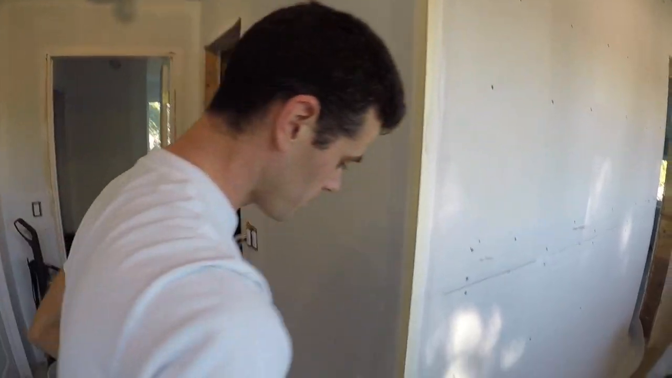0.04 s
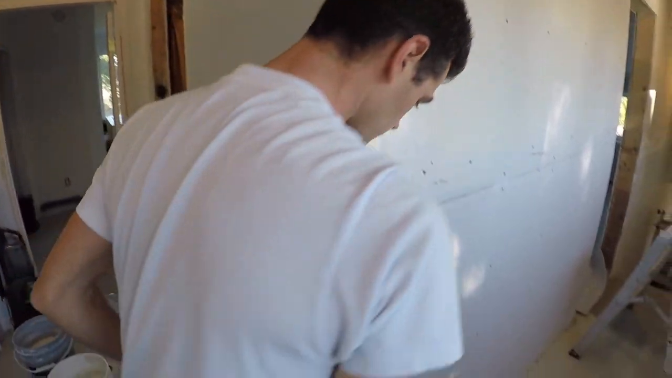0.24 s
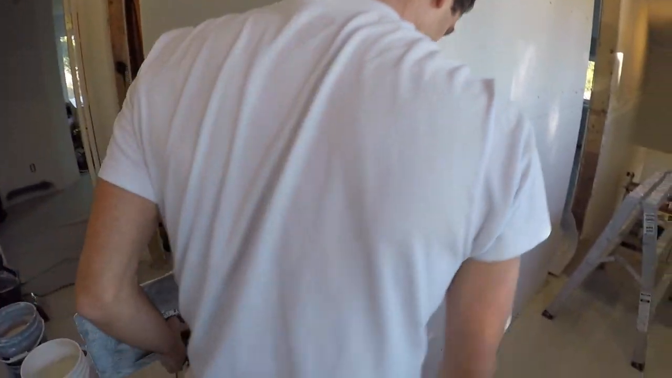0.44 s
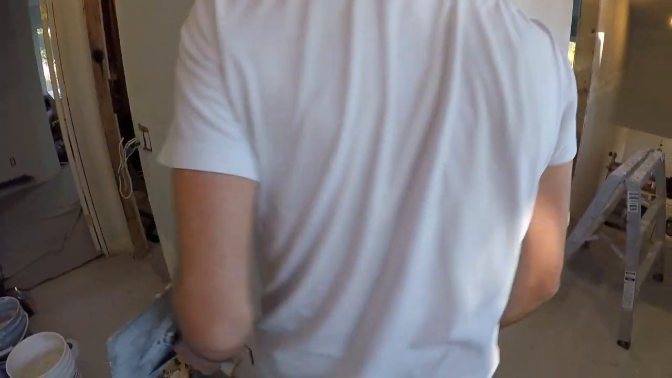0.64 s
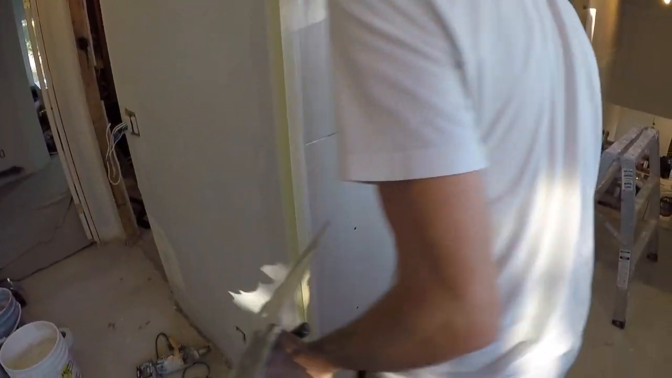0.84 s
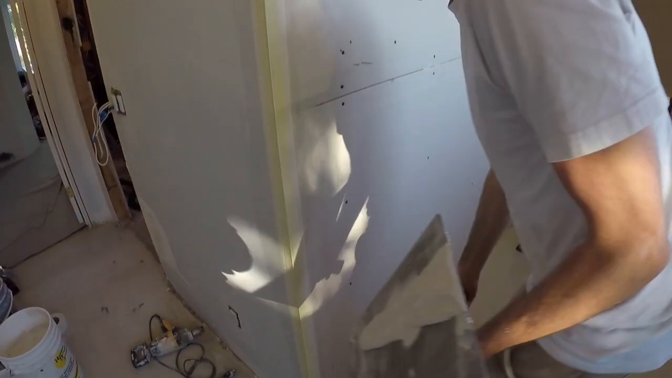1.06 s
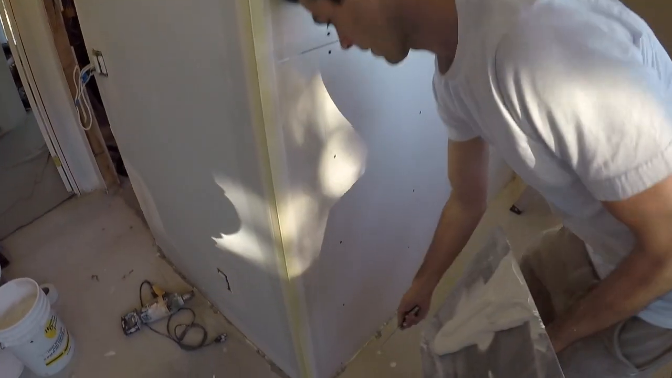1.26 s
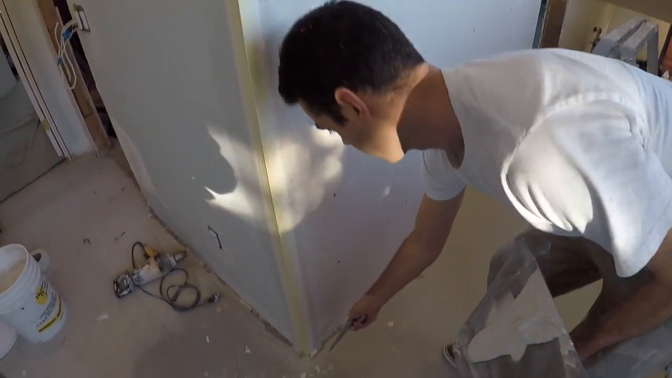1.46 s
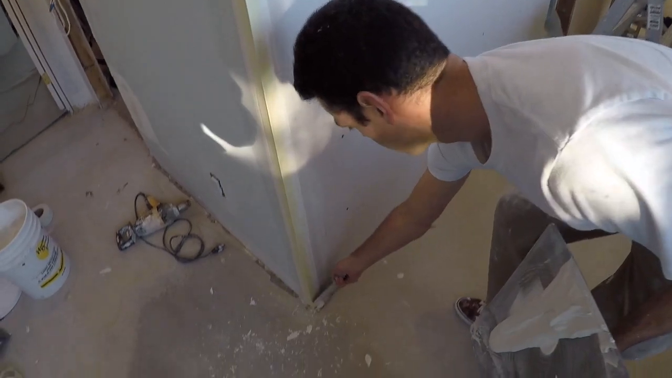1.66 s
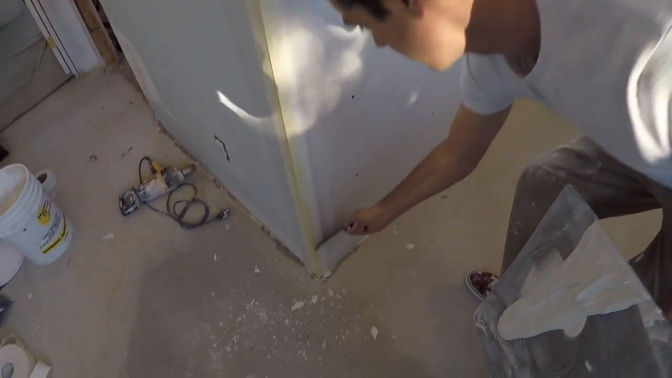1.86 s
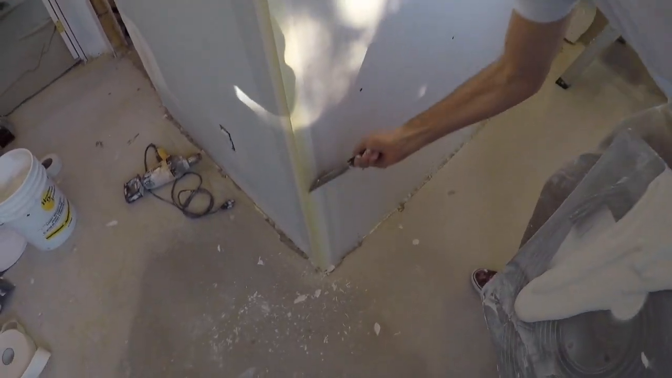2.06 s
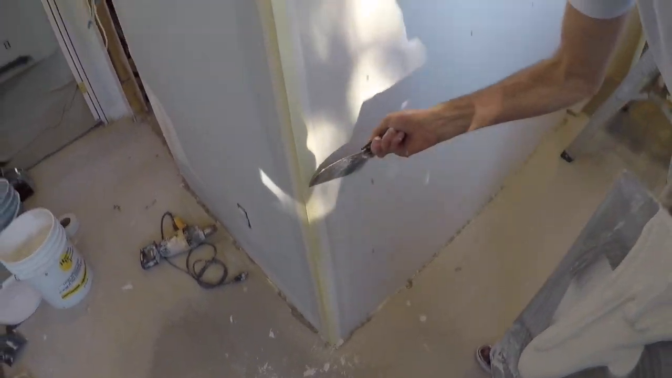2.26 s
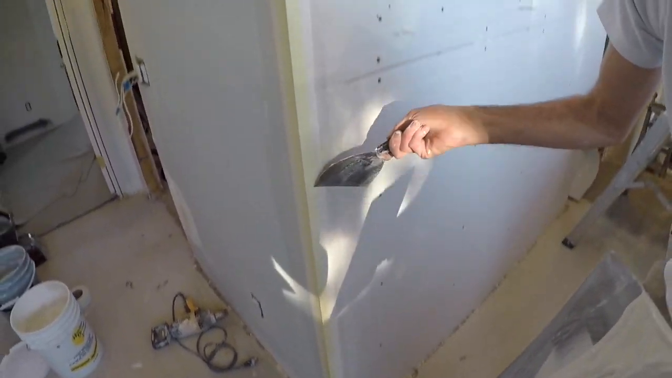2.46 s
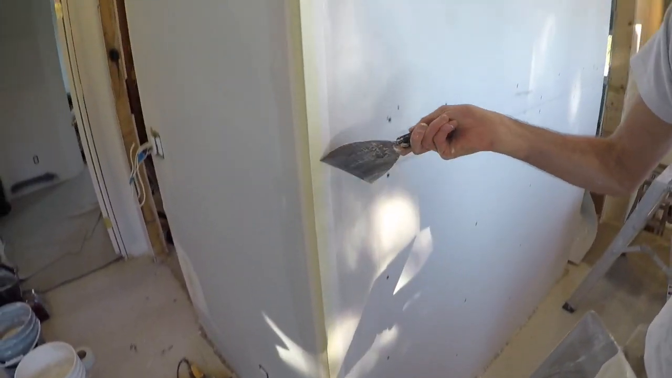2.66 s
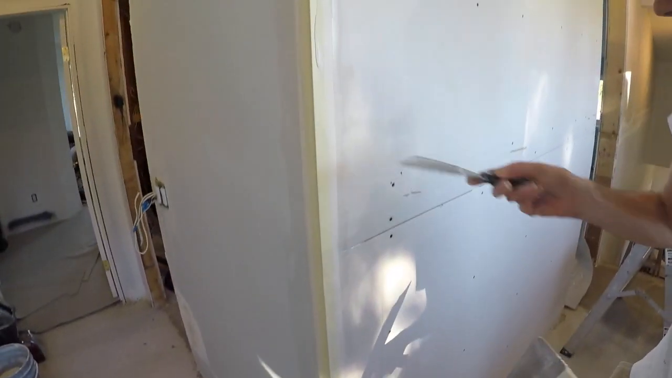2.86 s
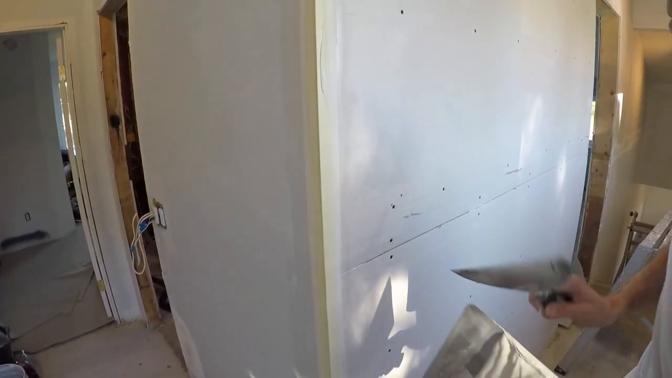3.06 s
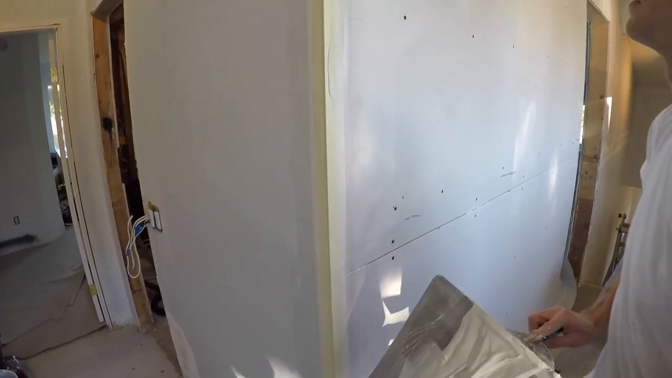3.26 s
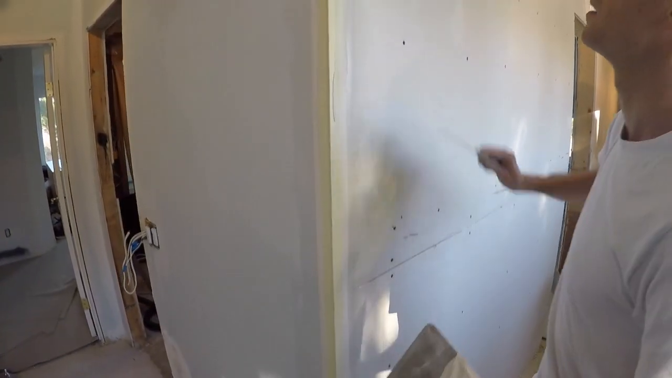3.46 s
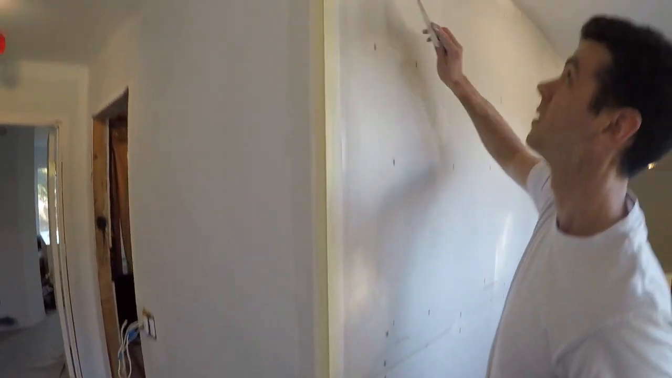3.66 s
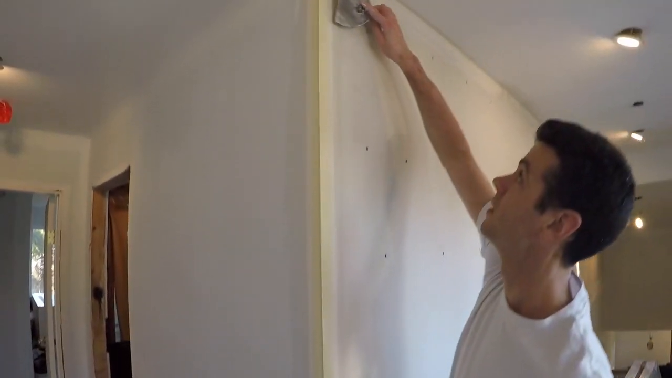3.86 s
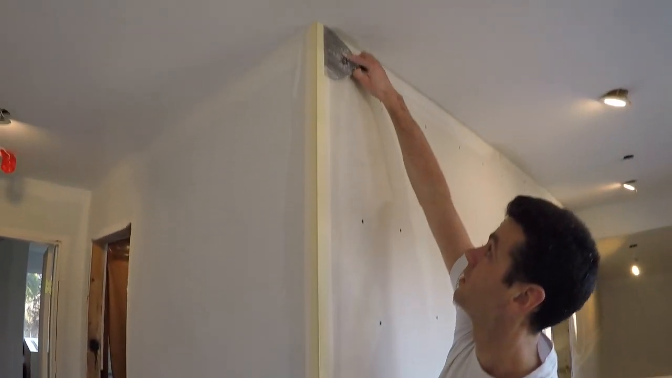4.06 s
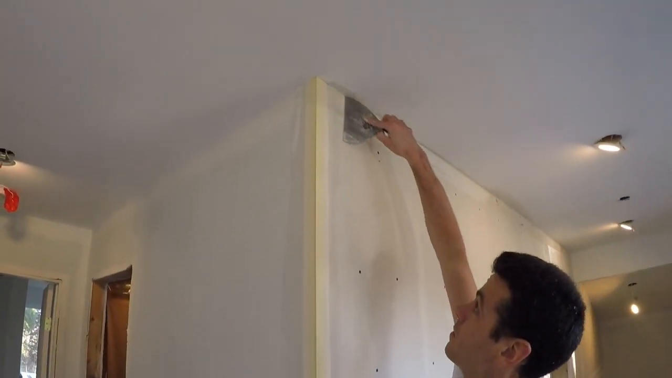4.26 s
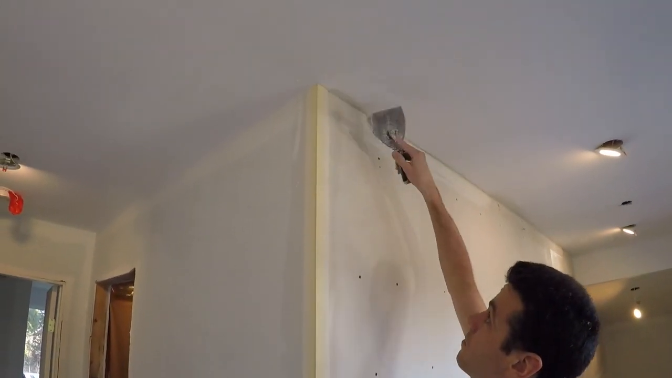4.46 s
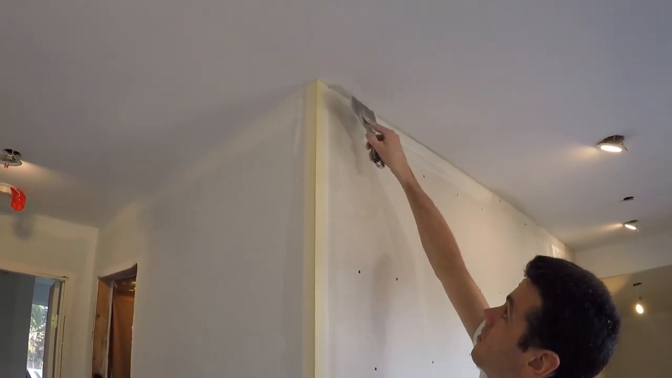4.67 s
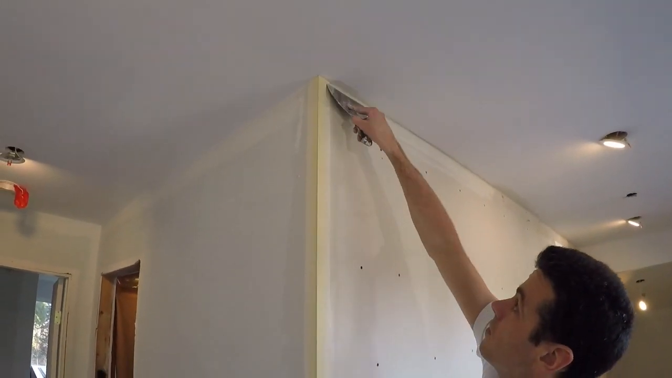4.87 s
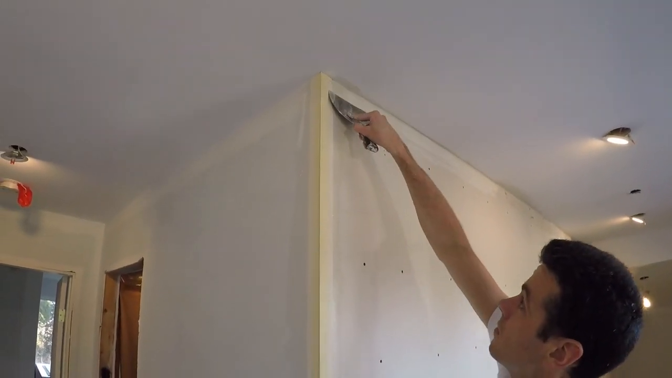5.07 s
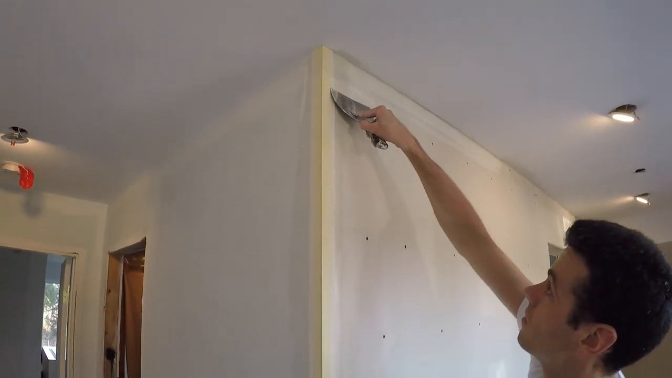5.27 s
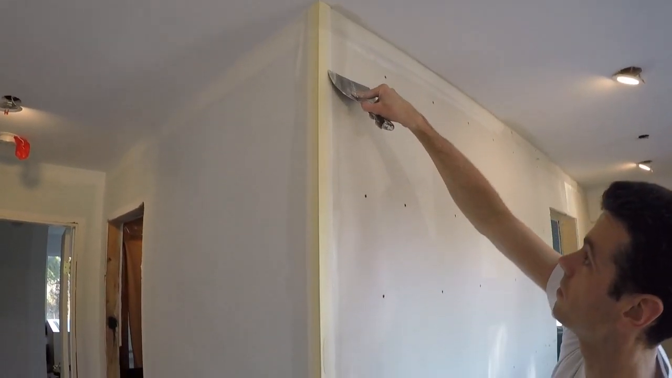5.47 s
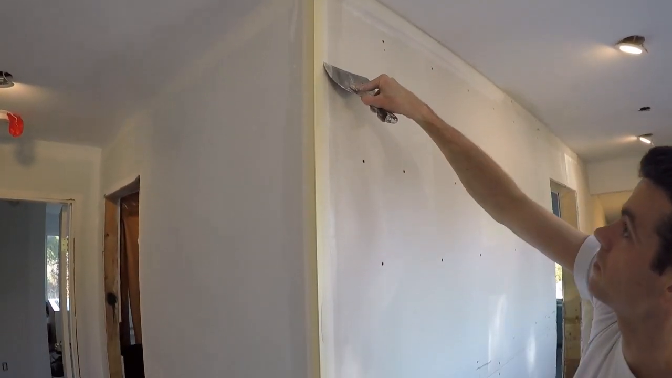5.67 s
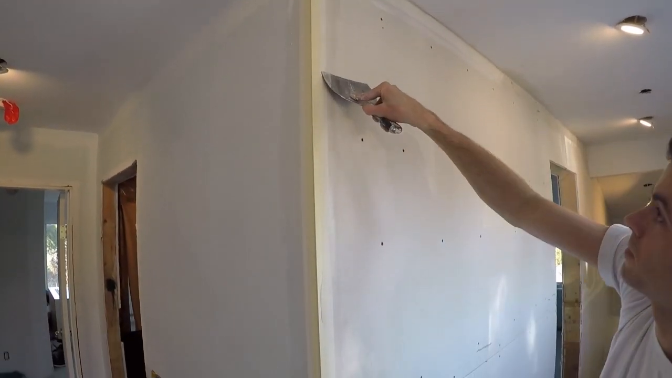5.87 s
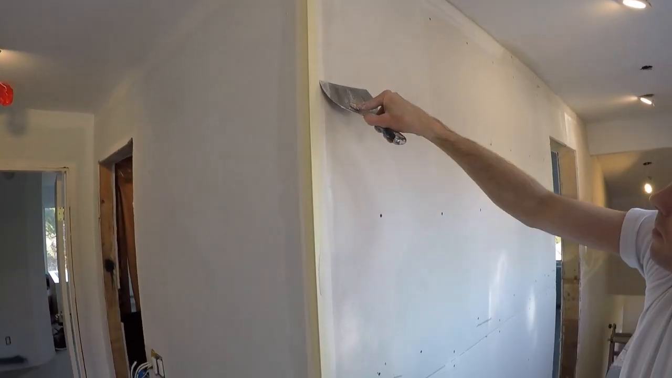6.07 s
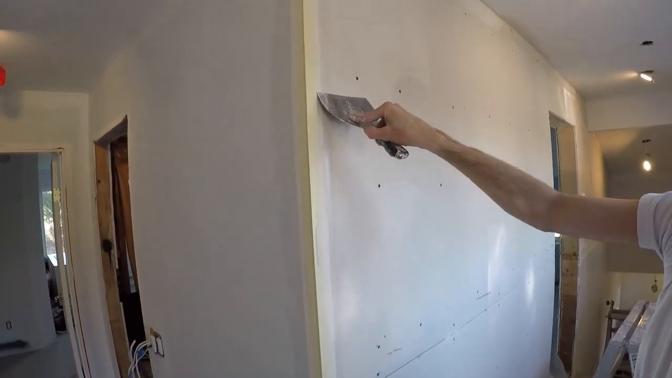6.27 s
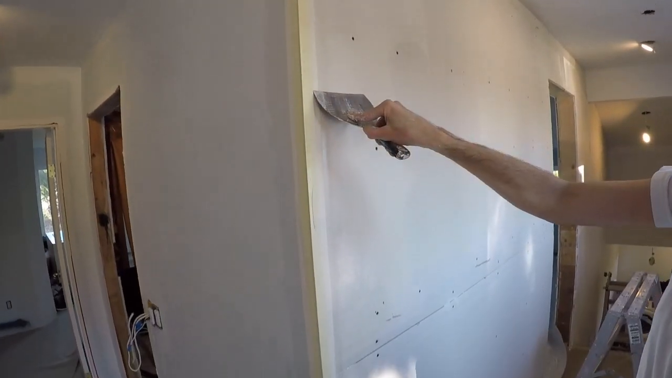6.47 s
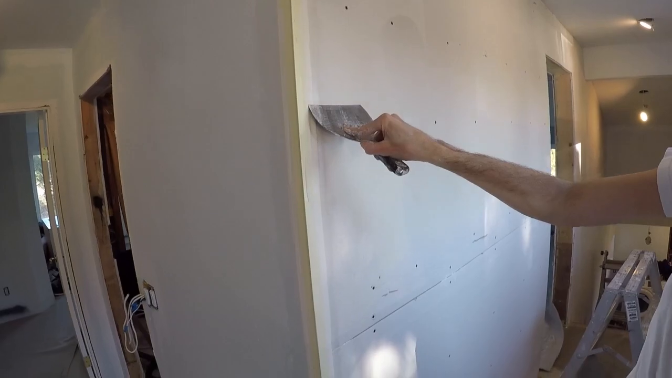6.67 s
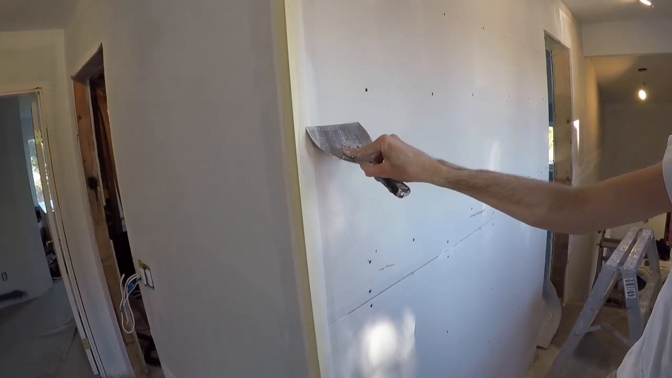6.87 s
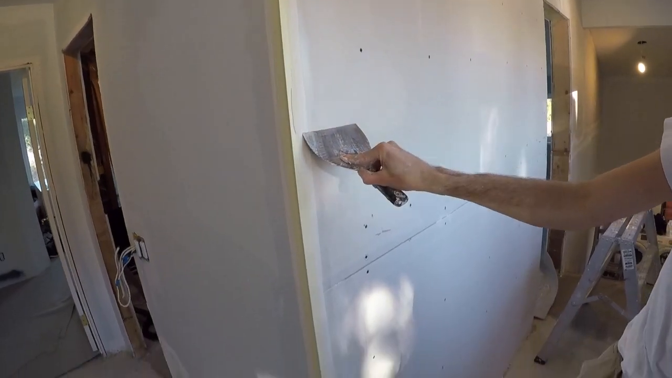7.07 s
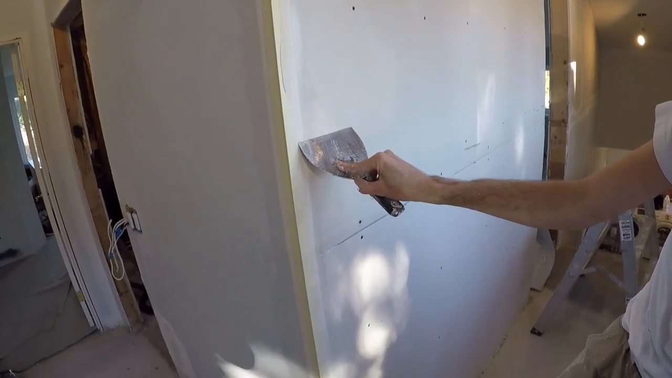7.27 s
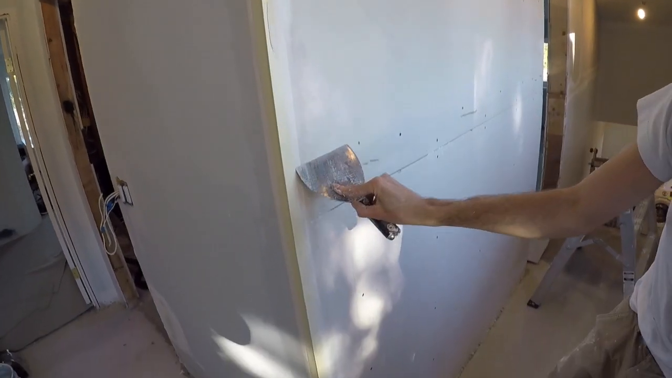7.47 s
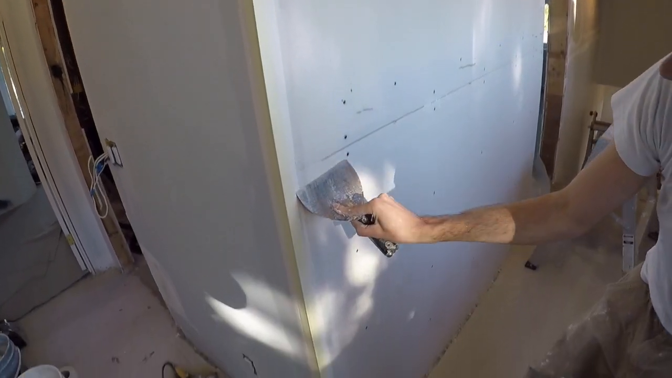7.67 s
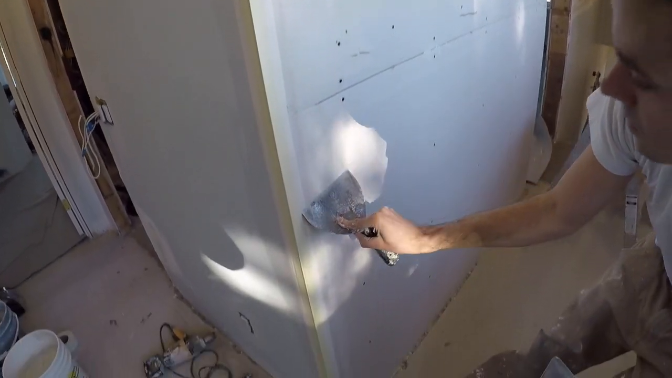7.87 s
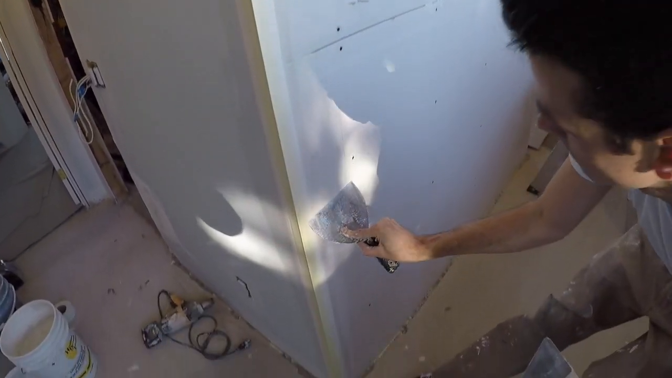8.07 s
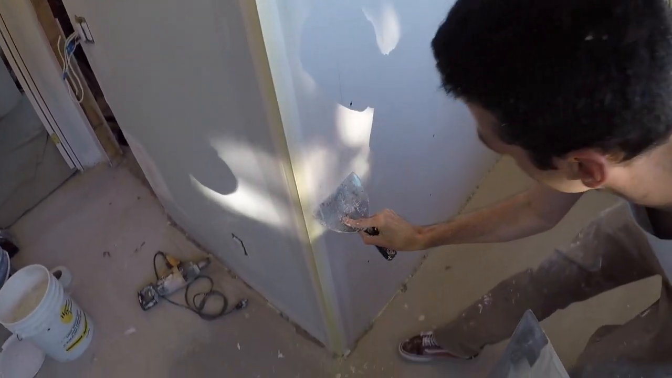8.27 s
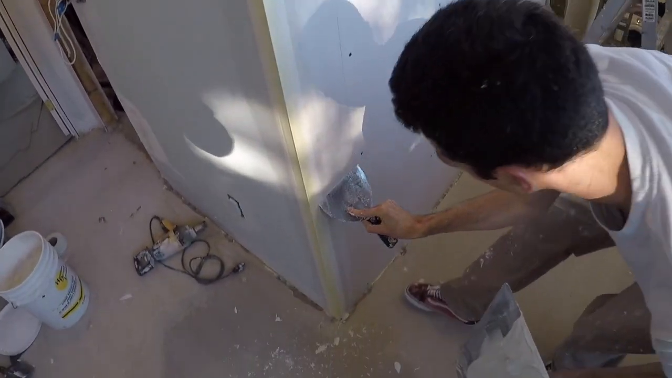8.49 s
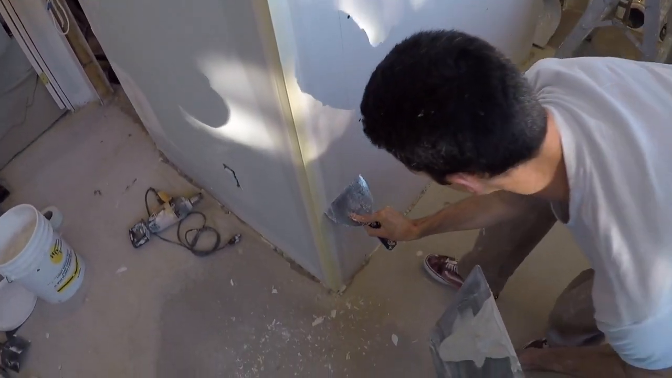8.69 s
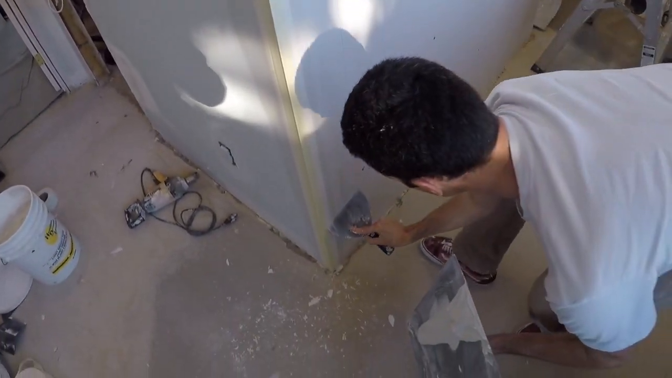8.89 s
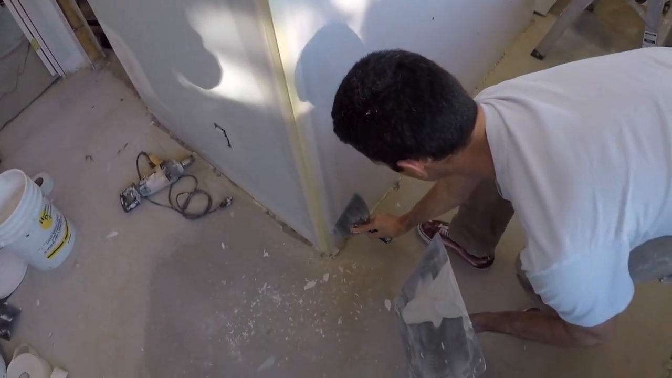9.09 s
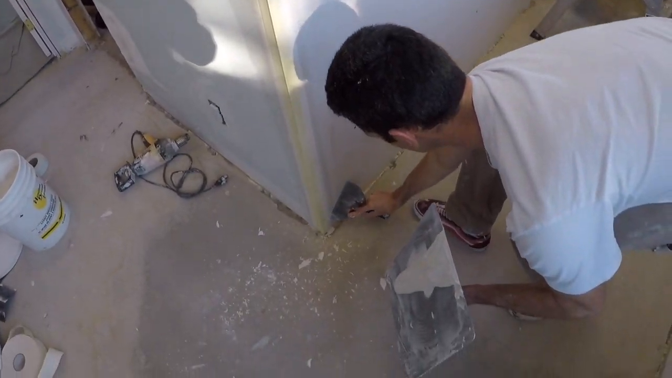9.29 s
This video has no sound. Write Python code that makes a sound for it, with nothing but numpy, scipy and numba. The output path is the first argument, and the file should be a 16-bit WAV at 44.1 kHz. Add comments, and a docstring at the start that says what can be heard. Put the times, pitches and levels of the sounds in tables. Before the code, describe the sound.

In a bare room, a steel drywall knife rasps up a plastered corner, clacks hard on a metal plate, then scrapes slowly down, ringing.

```python
"""In a bare, half-built room, a steel drywall knife is drawn up, set lightly and drawn down a plastered corner.
Grit under the edge makes a rasp and drives the blade's bending modes, which shift with angle and pressure.
Touches and one bouncing clack on the hawk set damped modes ringing under short bursts of noise; shoes, clothes
and tools scuff as swells of grit, loose metal jingles, the wall board bumps. Decaying noise gives the room.
One microphone, rumbling as it is carried, hears it all over the quiet of the site."""
import sys
import numpy as np
from scipy import signal
from scipy.fft import rfft, irfft, next_fast_len
from scipy.io import wavfile
from numba import njit

SR = 44100
rng = np.random.default_rng(int(sys.argv[2]) if len(sys.argv) > 2 else 0)


def transcribe(signal):
    """Save signal, clipped to [-1, 1], as a 16-bit WAV file at the path in sys.argv[1]."""
    frames = np.atleast_2d(signal).T
    limited = np.clip(frames, -1, 1)
    pcm = np.round(limited * 32767).astype(np.int16)
    wavfile.write(sys.argv[1], SR, pcm)


N = 411453


def amp(db):
    """Turns dB into gain."""
    return 10 ** (np.asarray(db) / 20)


def rms_one(x):
    """Scales to rms 1."""
    return x / np.sqrt(np.mean(x ** 2) + 1e-20)


def in_time(rows, fade_s=0.039):
    """Reads the columns at every sample, with a gate that is open while the table lasts."""
    s, *columns = np.transpose(rows)
    t = np.arange(N) / SR
    to_nearest_end = np.minimum(t - s[0], s[-1] - t)
    gate = np.clip(to_nearest_end / fade_s + .5, 0, 1)
    return gate, [np.interp(t, s, column) for column in columns]


def at_hz(points, hz):
    """Reads a table on a log-frequency axis."""
    table_hz, values = np.array(points)[:, :2].T
    return np.interp(np.log(hz + 1e-3), np.log(table_hz), values)


def drift(rate_hz):
    """Slow chance with spread 1: noise through two equal low-pass poles, run at every 40th sample."""
    r = np.exp(-80 * np.pi * rate_hz / SR)
    noise = rng.standard_normal(N // 40 + 2002)
    slow = signal.lfilter([1], [1, -2 * r, r * r], noise)[2000:]   # without the filter's start
    return np.interp(np.arange(N) / 40, np.arange(len(slow)), rms_one(slow))


def coloured(x, spectrum):
    """Weights x by a table of relative dB over Hz; rms 1."""
    size = next_fast_len(N)
    gain = amp(at_hz(spectrum, np.fft.rfftfreq(size, 1 / SR)))
    return rms_one(irfft(rfft(x, size) * gain, size)[:N])


LOW_SPLIT_HZ, HIGH_SPLIT_HZ = 900, 4750


def three_bands(x):
    """Splits into low, middle and high with gentle in-phase slopes, each of rms 1."""
    size = next_fast_len(N)
    hz, spectrum = np.fft.rfftfreq(size, 1 / SR), rfft(x, size)
    low = 1 / (1 + (hz / LOW_SPLIT_HZ) ** 4)
    high = 1 / (1 + (HIGH_SPLIT_HZ / (hz + 1)) ** 4)
    return [rms_one(irfft(spectrum * share, size)[:N]) for share in (low, 1 - low - high, high)]


def grit(per_s, spread_db):
    """Grains of uneven size and either sign, caught at random moments; rms 1."""
    sizes = amp(spread_db * np.minimum(rng.exponential(1, N), 5)) * rng.choice([-1, 1], N)
    caught = rng.random(N) < per_s / SR
    return rms_one(sizes * caught)


@njit
def glide(x, pull, r):
    """Two-pole resonance whose pitch moves sample by sample."""
    y = np.zeros(len(x))
    for i in range(2, len(x)):
        y[i] = x[i] - x[i - 2] + pull[i] * y[i - 1] - r * r * y[i - 2]
    return y


def ring(clicks, hz, t60_s):
    """A unit click sets a decaying sine of height about 1 ringing."""
    r, w = amp(-60 / (t60_s * SR)), 2 * np.pi * hz / SR
    return signal.lfilter([.5, 0, -.5], [1, -2 * r * np.cos(w), r * r], clicks + 1e-18)


def struck(times, modes, level_db):
    """Each blow strikes every damped mode with a strength of its own."""
    at, out = (times * SR).astype(int), np.zeros(N)
    luck_db = rng.normal(0, 0.83, (len(at), len(modes)))
    for (hz, mode_db, t60_s), mode_luck_db in zip(modes, luck_db.T):
        clicks = np.zeros(N)
        clicks[at] = amp(level_db + mode_db + mode_luck_db)
        out += ring(clicks, hz, t60_s)
    return out


def bursts(times, level_db, decay_s, noise):
    """Noise that starts at once and dies fast, to 1/e in decay_s."""
    clicks = np.zeros(N)
    clicks[(times * SR).astype(int)] = amp(level_db)
    envelope = signal.lfilter([1], [1, -np.exp(-1 / (decay_s * SR))], clicks + 1e-18)
    return envelope * noise


def rubbing(low, middle, high, friction, flicker_db):
    """Friction in three bands, each under its own gain, the contact catching and easing."""
    bands = three_bands(friction)
    mixed = low * bands[0] + middle * bands[1] + high * bands[2]
    return mixed * amp(flicker_db * drift(6.9))


# Colour of the quiet site. Each row: frequency in Hz, relative density in dB per Hz.
HUSH_COLOUR = [(24, -23.5), (40, -2.5), (49, -14.5), (108, -19.5), (165, -19), (187, -24.5), (217, -21),
               (1180, -33), (1440, -32.5), (12200, -44.5), (15300, -34.5)]


def hush():
    """The quiet of the site: coloured noise that swells slowly about -62 dB."""
    level_db = -62 + .8 * drift(2.5)
    return amp(level_db) * coloured(rng.standard_normal(N), HUSH_COLOUR)


# Rumble of the carried microphone. Each row: time in seconds, rms level in dB.
RUMBLE_LEVEL = [(0.0, -36.5), (2.41, -35.5), (2.7, -42.5), (3.53, -32), (4.86, -37.5), (6.75, -43.5),
                (6.94, -35), (8.37, -44.5), (9.09, -37.5), (9.33, -41)]
# Its colour. Each row: frequency in Hz, relative density in dB per Hz.
RUMBLE_COLOUR = [(1.2, -26.5), (2.0, 20), (16, 3.5), (25, -16.5), (35, -39.5), (48, -33), (60, -17),
                 (78, -60), (130, -120)]


def rumble():
    """Carrying the microphone makes a deep noise of changing level."""
    _, (level_db,) = in_time(RUMBLE_LEVEL)
    return amp(level_db) * coloured(rng.standard_normal(N), RUMBLE_COLOUR)


# Shoes, clothes and tools. Each row: time the middle band is loudest in seconds, its level in dB, rise in seconds,
# fall in dB per second, low body in dB re the middle, high grit in dB re the middle,
# share of the rise by which the grit peaks before the middle and the body after it.
SCUFFS = [(.03, -68, 0.079, 65, -5, -4.5, 0), (.1, -67, 0.023, 71, 9.5, -10, 0),
          (.2, -65, 0.057, 101, -3, 5, .3), (.34, -68.5, 0.04, 75, -2, 1.5, 0.24),
          (0.719, -50, 0.071, 123, -8, -0.5, 0.3), (0.949, -55.5, 0.16, 139, -1.5, -7, 0.043),
          (1.182, -45.5, 0.055, 113, -7.5, 3.5, 0.66), (1.36, -57, 0.12, 78, -1, -24, 0),
          (1.525, -49.5, 0.049, 185, -13, -7.5, 0.41), (1.63, -42, 0.014, 348, -1, -20, 0.39),
          (2.699, -36, .08, 126, -7.5, -8, 0), (2.735, -43.5, 0.082, 210, -6, 0.5, 0.45),
          (3.1, -54.5, 0.018, 106, -16, -3.5, .3), (3.53, -56.5, 0.15, 66, -12, -4.5, 0.031),
          (3.969, -53, .01, 65, -4, -4, .3), (4.18, -63.5, 0.12, 71, -12.5, -6, 0.079),
          (4.245, -54.5, .04, 117, 5.5, -12, 0.04), (4.281, -47, 0.055, 179, -1.5, -5, 0.2),
          (4.45, -68.5, 0.051, 100, -14, 5, 0.053), (4.875, -53.5, 0.0033, 115, 0.5, -20, .3),
          (9.1, -54, 0.12, 72, 0.5, -1, 0.083), (9.31, -64, 0.037, 58, 0, 0, 0)]
# Colour within the three bands. Each row: frequency in Hz, relative density in dB per Hz.
SCUFF_COLOUR = [(120, -32.5), (200, -5.5), (594, 5), (651, 4), (700, 5.5), (902, 6), (1670, 3.5), (2160, 5),
                (3850, -0.5), (7820, -5.5), (15300, -26.5)]
RISE_POWER = 1.9   # bend of the rise


def scuffs():
    """Each scuff swells from silence and fades evenly in dB; often the grit peaks first and the body follows."""
    t, powers = np.arange(N) / SR, np.zeros((3, N))
    for s, level_db, rise_s, fall_db, body_db, grit_db, lead in SCUFFS:
        near = slice(int(max(s - rise_s, 0) * SR), int((s + 60 / fall_db) * SR))
        since = t[near] - s + rise_s
        lead = np.clip(lead, -.9, .9)
        for band, (band_db, lag) in enumerate([(body_db, lead), (0, 0), (grit_db, -lead)]):
            top_s = rise_s * (1 + lag)
            swell = np.clip(since / top_s, 0, 1) ** RISE_POWER
            fade_db = fall_db * np.maximum(since - top_s, 0)
            powers[band, near] += (swell * amp(level_db + band_db - fade_db)) ** 2
    low, middle, high = np.sqrt(powers)
    return rubbing(low, middle, high, coloured(grit(9000, 1.8), SCUFF_COLOUR), flicker_db=1.4)


# Blade touching the wall or the hawk. Each row: time in seconds, level in dB before the trims below,
# centre of the knock in Hz, fall away from it in dB per octave, thud in dB re the level, tick in dB re the level,
# t60 of the ring in seconds.
TAPS = [(.085, -44, 641, 6, -7, -26, 0.025), (1.135, -33, 3130, 33, -26, -10, 0.029),
        (1.499, -43.5, 3000, 10, -18, -26, 0.068), (1.623, -22.5, 988, 3.5, -9, -24, 0.011),
        (1.639, -24, 1150, 20, -5, -29, 0.072), (2.731, -24, 5420, 18.5, -31, -8, 0.032),
        (3.944, -34, 3280, 10, -1, -19.5, 0.018), (3.967, -42.5, 2835, 9.5, -21, 0.5, .06),
        (4.852, -45, 2497, 11, -31, -18, 0.016), (4.866, -28, 1640, 8, -20, -22.5, 0.032),
        (5.361, -32, 1380, 10.5, 2.5, -11, 0.057), (7.62, -12.5, 1190, 16.5, -35, -23, 0.048),
        (9.241, -21, 960, 31, 0, -37, 0.031), (9.252, -31.5, 300, 21, -7, -37, 0.098),
        (9.291, -40, 960, 37, -10, -30, .04)]
# Modes of the touched blade. Each row: frequency in Hz, relative level in dB.
TAP_MODES = [(291, -2.5), (463, 5.5), (690, 2.5), (960, -2), (1250, -5), (1550, 1.5), (2050, -5),
             (2250, -2.5), (2750, -4), (3150, -1.5), (3520, 4), (3750, -2.5), (5100, -1.5), (5900, -7)]
# Splash of a knock, for touches and clacks. Each row: frequency in Hz, relative density in dB per Hz.
SPLASH_COLOUR = [(150, -42), (250, -15), (571, 2.5), (1260, -2.5), (1400, -5), (1580, -3), (2930, -9),
                 (3860, -9.5), (9780, -16.5), (15300, -35)]


def taps():
    """Modes near the centre of a touch ring most, long when the blade hangs free; the board thuds, the edge ticks."""
    s, level_db, centre_hz, fall_db, thud_db, tick_db, t60_s = np.transpose(TAPS)
    hz, mode_db = np.transpose(TAP_MODES)[:, :, None]
    luck_db = rng.normal(0, 0.5, (len(s), len(hz), 1))
    t, rings = np.arange(SR // 2) / SR, np.zeros(N + SR)
    contact = 1 - np.exp(-t / 0.0017)   # the touch takes a moment to build
    for k, at in enumerate((s * SR).astype(int)):
        octaves_off = np.abs(np.log2(hz / centre_hz[k]))
        start_db = level_db[k] - 3.5 + mode_db + luck_db[k] - fall_db[k] * octaves_off
        modes = amp(start_db - 60 * t / t60_s[k]) * np.sin(2 * np.pi * hz * t)
        rings[at:at + len(t)] += np.sum(modes, axis=0) * contact
    low, middle, high = three_bands(coloured(rng.standard_normal(N), SPLASH_COLOUR))
    thud = bursts(s, level_db + thud_db - 13.0, 0.0017, low)
    tick = bursts(s, level_db + tick_db - 9.5, 0.0036, middle)
    tick += bursts(s, level_db + tick_db - 2.0, .005, high)
    return rings[:N] + thud + tick


# Dull bumps through the wall and floor. Each row: time in seconds, level in dB before the mode levels.
THUMPS = [(0.093, -56), (1.623, -60), (5.7, -54.5), (7.615, -47)]
# Wall board. Each row: mode in Hz, relative level in dB, t60 in seconds.
PANEL_MODES = [(118, -5.5, 0.133), (161, 2, .1), (227, -1.5, .08)]


def thumps():
    """A bump sets a few low panel modes going briefly."""
    s, level_db = np.transpose(THUMPS)
    return struck(s, PANEL_MODES, level_db)


# Loose bits of metal. Each row: time in seconds, level in dB before the mode levels.
JINGLES = [(.178, -51.5), (.206, -58), (.222, -64), (.255, -68), (.325, -60), (.345, -60), (.372, -67)]
# Their ringing. Each row: mode in Hz, relative level in dB, t60 in seconds.
JINGLE_MODES = [(5600, -8, .06), (6200, -10, .05), (6947, -3, .09), (7200, -6, .05), (7900, -8, .05),
                (8500, -3, .05), (9780, -7, .05)]


def jingles():
    """Small metal parts knock together and ring high and short."""
    s, level_db = np.transpose(JINGLES)
    return struck(s, JINGLE_MODES, level_db)


def strands(x, share_db, count):
    """The many minor modes of a thin blade: short streaks that wander, come and go."""
    out, r = x.copy(), np.exp(-np.pi * 90 / SR)   # each 90 Hz wide
    for hz in np.geomspace(800, 4300, count):
        pull = 2 * r * np.cos(2 * np.pi * hz * (1 + .03 * drift(2.5)) / SR)
        out += amp(share_db + 2.9 * drift(6.0)) * (1 - r) * glide(x, pull, r)
    return rms_one(out)


# Bending modes. Each row: frequency at rest in Hz, how far it follows the low, the middle and the upper
# singing mode (three exponents), width of each of its two resonances in Hz.
BLADE_MODES = [(612, 1, 0, 0.024, 76), (1004, 0, 0.023, 0.42, 110), (1348, 0.021, 1, 0.025, 71),
               (1589, 0.019, .5, 0.68, 87), (2463, 0, 0.073, 1, 72), (2804, 0, .12, 0.11, 73),
               (3560, 0, 0, .4, 120)]
# The low, middle and upper singing mode at rest. Each row: frequency in Hz.
REST_HZ = [
    [620],
    [1350],
    [2450],
]


def blade(rasp_db, leaders_hz, modes_db, wobble, flicker_db):
    """Grit feeds each bending mode, a steep double resonance; the hand makes its pitch and strength waver."""
    out, grains = np.zeros(N), grit(6000, 4.5)
    bend = np.log(leaders_hz / np.array(REST_HZ))
    for (rest_hz, *follows, width_hz), mode_db in zip(BLADE_MODES, modes_db):
        hz = rest_hz * np.exp(np.dot(follows, bend))
        shake = np.clip(amp(.45 * (rasp_db + mode_db + 52)), .6, 2.2)   # driven hard, it chatters in pitch
        r = np.exp(-np.pi * width_hz / SR)
        pull = 2 * r * np.cos(2 * np.pi * hz * (1 + wobble * shake * drift(14)) / SR)
        fed = np.roll(grains, rng.integers(N))   # the same grains at another moment
        sung = rms_one(glide(glide(fed, pull, r), pull, r))
        out += amp(mode_db + flicker_db * (drift(4.8) + 0.4 * drift(1.33))) * sung
    return amp(rasp_db) * out


# Edge on the wall, one table a stroke. Each row: time in seconds, rasp in dB before its trim, hiss in dB re that
# rasp, singing in dB re that rasp, low, middle and upper singing mode of the flexed blade in Hz.
STROKES = [
    [(1.69, -39.5, 0.5, -9, 704, 1130, 2470), (1.8, -30, -11, 1, 676, 1230, 2375),
     (1.87, -28, -13, -3.5, 690, 1213, 2534), (1.94, -25, -17, -9.5, 740, 1487, 2420),
     (2.03, -29, -8.5, 1.5, 760, 1560, 2540), (2.14, -25.5, -5.5, -5.5, 740, 1540, 2598),
     (2.25, -28.5, -5, -0.5, 750, 1575, 2524), (2.37, -29, -12.5, -3.5, 710, 1563, 2580),
     (2.5, -33, -7, -3.5, 690, 1800, 2990), (2.6, -35, -6.5, -1.5, 710, 1766, 2860),
     (2.68, -25.5, -2.5, -6, 776, 1460, 1900)],
    [(4.95, -63.5, 7.5, 4, 548, 1225, 2410), (5.2, -58, 5.5, 6, 500, 1207, 2420),
     (5.47, -57, 5, 0.5, 556, 1243, 2430), (5.82, -47.5, 0, -4.5, 590, 1350, 2540),
     (6.15, -46.5, 0, -4, 610, 1330, 2610), (6.45, -50, -1.5, 1, 596, 1310, 2560),
     (6.9, -41.5, -4.5, -2, 626, 1355, 2630), (7.22, -43, -5.5, 3.5, 642, 1470, 2552),
     (7.36, -38, -4.5, 1.5, 647, 1357, 2320), (7.55, -33.5, -7, 2, 660, 1420, 2390),
     (7.85, -33.5, -8.5, -2.5, 735, 1373, 2265), (8.1, -32.5, -8, 0, 700, 1392, 2244),
     (8.3, -36.5, -10, 0.5, 730, 1345, 2210), (8.65, -27.5, -11, -4, 655, 1330, 2240),
     (8.85, -33, 0.5, -5.5, 620, 1218, 2180), (8.97, -32.5, -5, 6.5, 590, 1188, 2240),
     (9.12, -48.5, -7, -2, 540, 1247, 2250)],
    [(3.99, -52, -1, 0, 620, 1350, 2480), (4.12, -60, 0, 0, 620, 1300, 2620),
     (4.23, -55, 7, 0, 642, 1130, 2460), (4.32, -53, -1, 0, 640, 1100, 2360)],
]
# Where on the wall each mode sings best, a table a stroke, a row a bending mode. Each row: time in seconds,
# level there in dB re the singing, loss before it in dB per second, loss after it in dB per second.
SWEET_SPOTS = [
    [(1.9, -23.5, 8, 16.5), (2.35, -21, 15, 7.5), (2.05, -5, 25, 16), (2.15, -11.5, 6, 4),
     (2.22, -2.5, 29, 18), (2.3, -10, 17, 20.5), (2.3, -9.5, 17, 8.5)],
    [(5.6, -4, 22, 5), (5.7, -6.5, 18, 5.5), (8.95, -5, 1.5, 21), (6.35, -7, 4, 4.5), (7.25, -4, 7.5, 12.5),
     (7.9, -9.5, 37, 22), (6.78, -8.5, 13, 7)],
    [(4.8, -11, 40, 10), (4.4, -1, 60, 10), (4.8, -1, 40, 10), (4.1, -13.5, 10, 10), (4.18, -7, 20, 40),
     (4.1, -20, 10, 10), (4.2, -10, 10, 20)],
]
# The wall swells less than the rasp. One row: drone in dB re the rasp at full pressure for each of
# the three strokes, then the share of the rasp's swing in dB.
DRONE = (-16, -11, -18, 0.8)
# Colour of the rasp within its bands. Each row: frequency in Hz, relative density in dB per Hz.
RASP_COLOUR = [(120, -34), (200, -30.5), (399, -20), (700, -15.5), (1120, -13.5), (1390, -10), (1970, -8),
               (2490, -3.5), (5640, -4), (8260, 2), (10300, -7.5), (13500, -4), (15300, -0.5)]
FULL_DB = -32   # rasp at full pressure, before its trim


def strokes():
    """Pressure sets rasp, drone, hiss and the singing of the blade, whose modes trade strength along the wall."""
    low, middle, high, song = np.zeros((4, N))
    t = np.arange(N) / SR
    for k, (rows, spots) in enumerate(zip(STROKES, SWEET_SPOTS)):
        gate, (rasp_db, hiss_db, sing_db, *leaders_hz) = in_time(rows)
        low += gate * amp(FULL_DB + DRONE[k] + DRONE[-1] * (rasp_db - FULL_DB))
        middle += gate * amp(rasp_db)
        high += gate * amp(rasp_db + hiss_db)
        modes_db = [top_db - np.maximum(before_db * (s - t), after_db * (t - s))
                    for s, top_db, before_db, after_db in spots]
        song += gate * blade(rasp_db + sing_db, leaders_hz, modes_db, wobble=0.013, flicker_db=3.07)
    friction = strands(coloured(grit(9000, 1.9), RASP_COLOUR), 0.17, count=10)
    return amp(-7.5) * rubbing(low, middle, high, friction, flicker_db=1.4) + song


# Knife knocked on the hawk. Each row: time in seconds, level in dB before the trims below, crack in dB re it.
CLACKS = [(3.088, -41, -23), (3.111, -10.5, -16), (3.116, -1, -17.5), (3.124, -1, -13), (3.128, 4.5, -4),
          (3.139, -7, -8.5), (3.15, 1, -8.5), (3.165, -20.5, -14)]
# Loaded plate of the hawk. Each row: mode in Hz, relative level in dB, t60 in seconds.
HAWK_MODES = [(262, -24.5, 0.12), (440.7, -15, 0.12), (586, -20, 0.085), (642, -7, 0.048),
              (1042, -6.5, 0.049), (1270, -8, 0.01), (1520, -11.5, .025), (2030, -13, 0.053),
              (3000, -13, 0.037), (2980, -17, 0.036)]


def clacks():
    """A touch, the main knock and its bounces on the loaded plate: damped modes under a broad splash.
    Second result: what reaches the walls from all sides, where the splash has an even colour."""
    s, level_db, crack_db = np.transpose(CLACKS)
    low, middle, high = three_bands(coloured(rng.standard_normal(N), SPLASH_COLOUR))
    splash = bursts(s, level_db - 10.5, 0.0018, middle + amp(-6.0) * low)
    splash += bursts(s, level_db + crack_db - 4, 0.0025, high)
    modes = struck(s, HAWK_MODES, level_db - 14)
    main = np.zeros(N)
    main[int(s[np.argmax(level_db)] * SR)] = 1   # one click at the loudest knock
    even = np.dot(amp([-6.0, -1.5, -7.0]), three_bands(coloured(main, SPLASH_COLOUR)))
    return modes + splash, amp(-1.0) * modes + np.std(splash) * even


# Bare room. Each row: frequency in Hz, t60 in seconds.
ROOM_T60 = [(60, 0.35), (500, 0.51), (2000, 0.43), (5000, 0.44), (11000, 0.33)]


def room(x):
    """Diffuse tail: noise dying at its own rate in each half-octave band."""
    t, tail = np.arange(SR) / SR, np.zeros(SR)
    for low_hz in 45 * 2 ** np.arange(0, 8.4, .5):
        sos = signal.butter(2, [low_hz, low_hz * 2 ** .5], "band", fs=SR, output="sos")
        band = signal.sosfilt(sos, rng.standard_normal(SR))
        tail += band * amp(-60 * t / at_hz(ROOM_T60, low_hz * 2 ** .25))
    tail *= np.clip(t / 0.018, 0, 1)   # reflections build up
    return signal.fftconvolve(x, tail / np.sqrt(np.sum(tail ** 2)))[:N]


def scene():
    """Near sounds, their far room tail, hush and rumble; one microphone on both channels."""
    scuff, stroke = scuffs(), strokes()
    touch = taps() + thumps() + jingles()
    knock, spread = clacks()
    near = stroke + scuff + touch + knock
    far = room(amp(-10.5) * stroke + amp(-12.5) * scuff + amp(-4.5) * touch + amp(-8.5) * spread)
    return np.tile(near + far + hush() + rumble(), (2, 1))


def record(dry):
    """The microphone path rounds the peaks and cuts the top, 90 dB down from 16 kHz."""
    rounded = .72 * np.tanh(dry / .72)
    return signal.sosfilt(signal.cheby2(16, 90, 16000, fs=SR, output="sos"), rounded)


dry = scene()
out = record(dry)
transcribe(out)
```